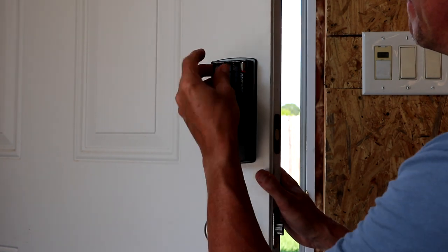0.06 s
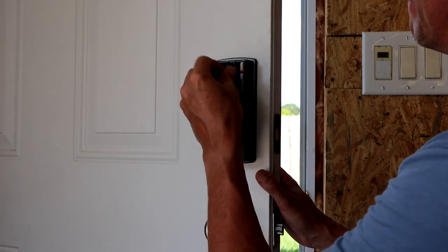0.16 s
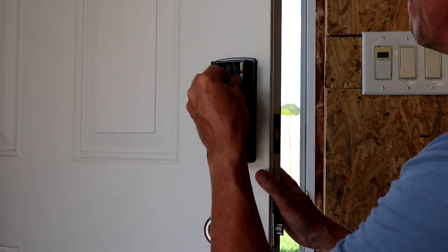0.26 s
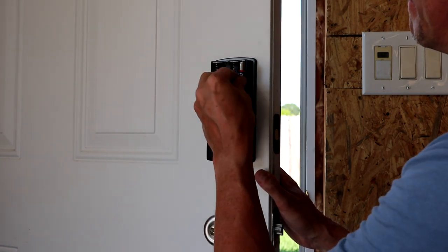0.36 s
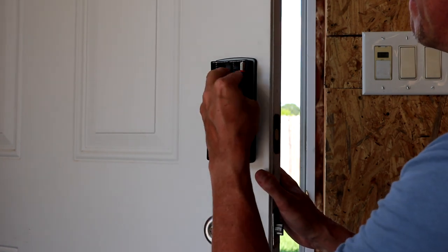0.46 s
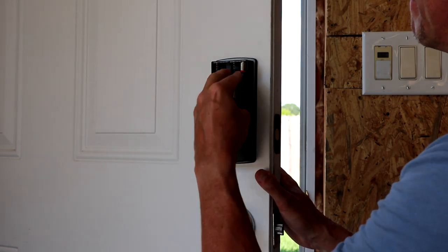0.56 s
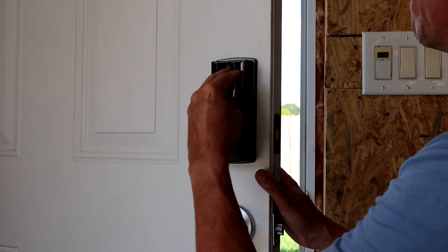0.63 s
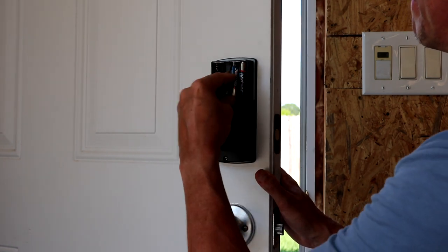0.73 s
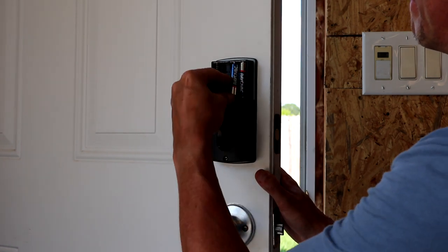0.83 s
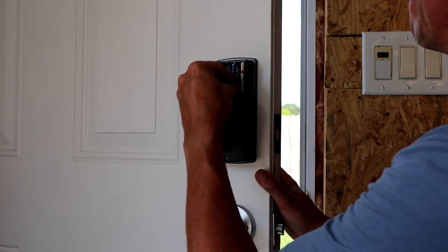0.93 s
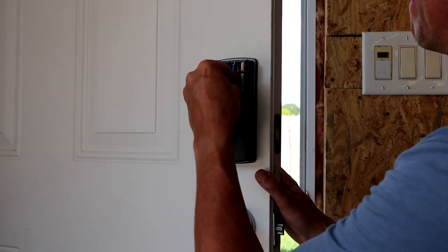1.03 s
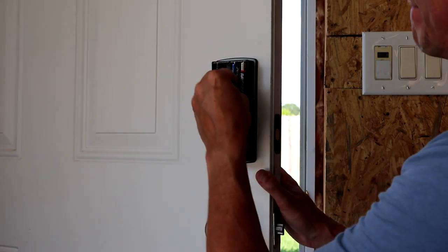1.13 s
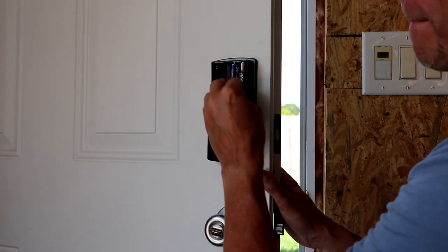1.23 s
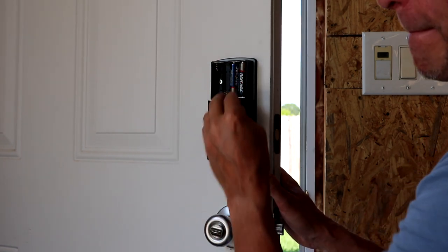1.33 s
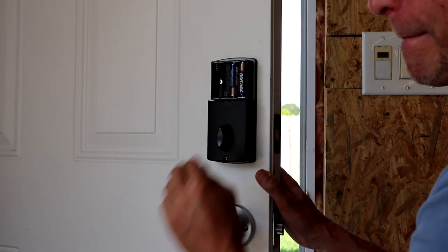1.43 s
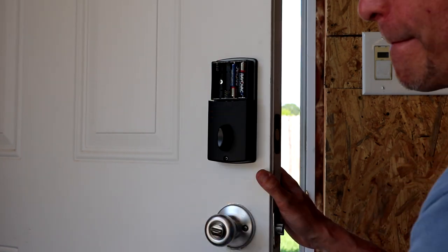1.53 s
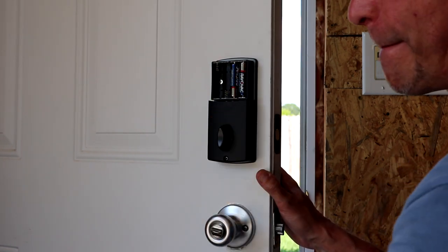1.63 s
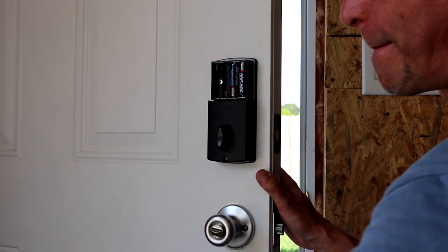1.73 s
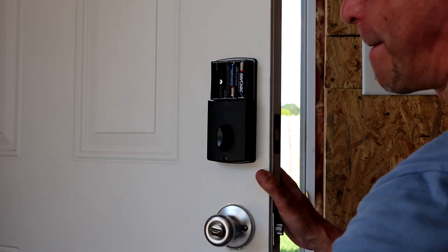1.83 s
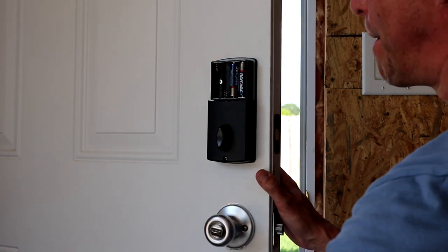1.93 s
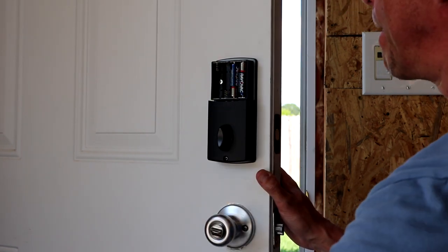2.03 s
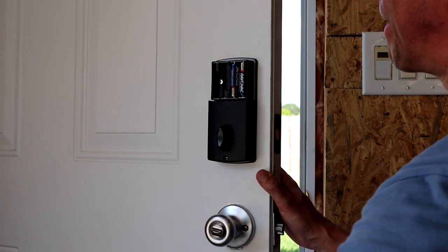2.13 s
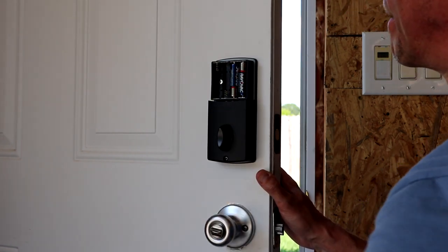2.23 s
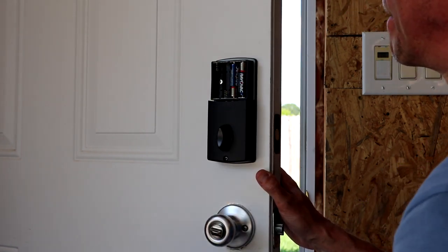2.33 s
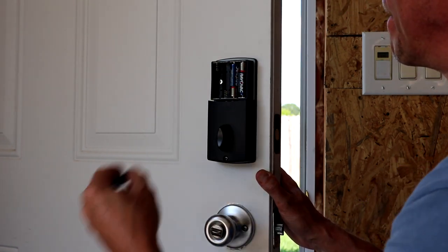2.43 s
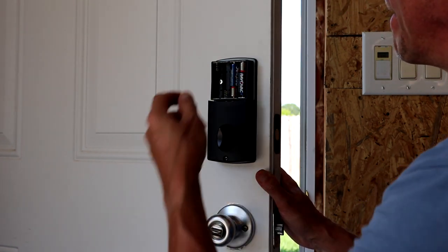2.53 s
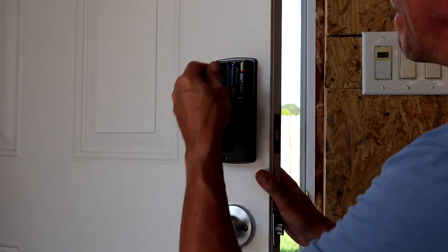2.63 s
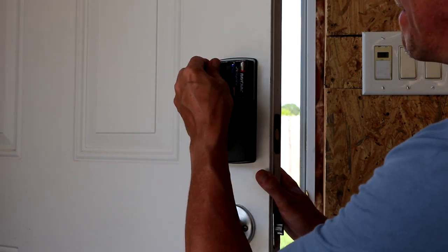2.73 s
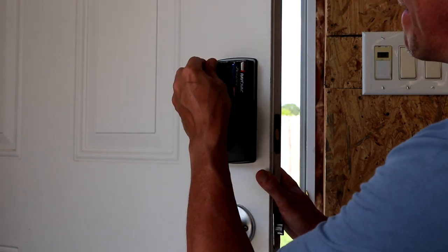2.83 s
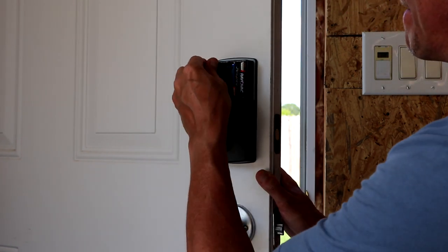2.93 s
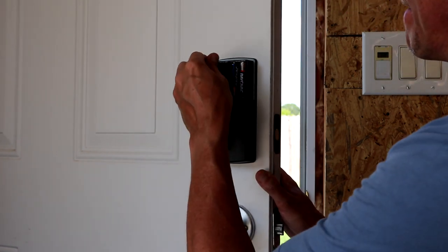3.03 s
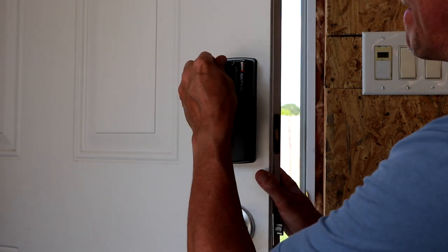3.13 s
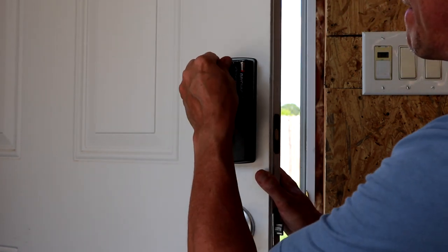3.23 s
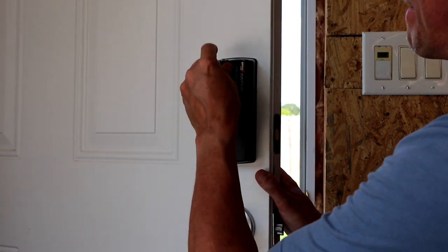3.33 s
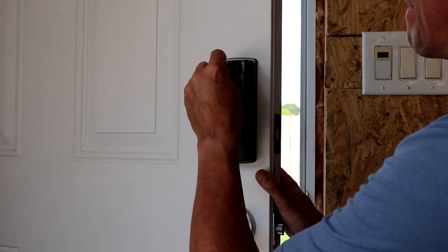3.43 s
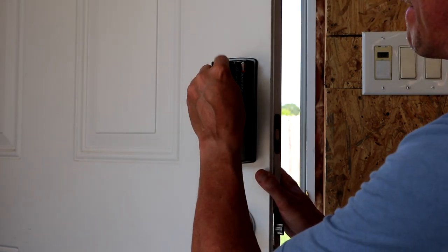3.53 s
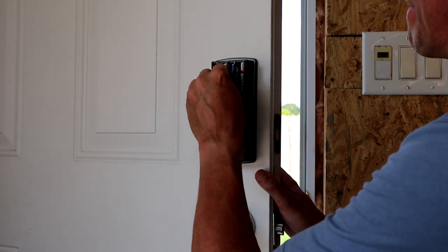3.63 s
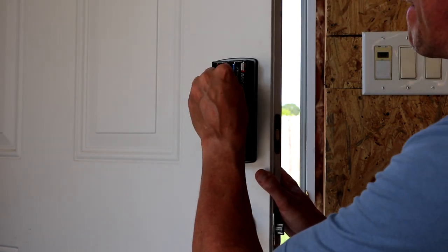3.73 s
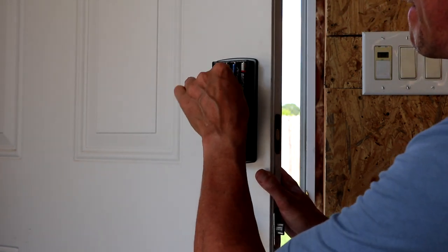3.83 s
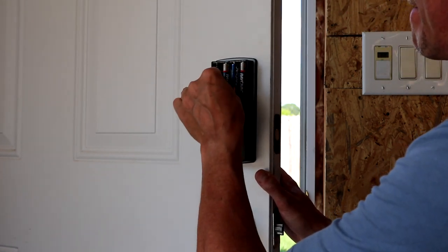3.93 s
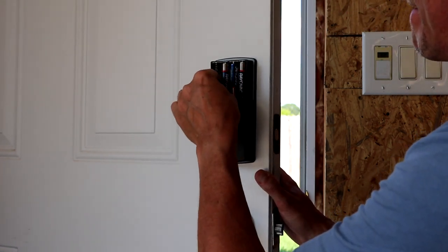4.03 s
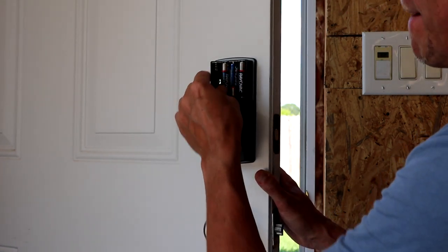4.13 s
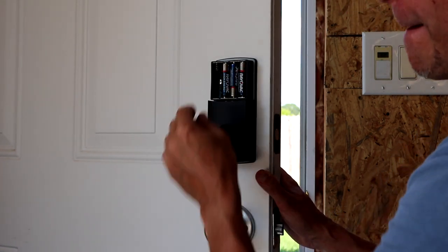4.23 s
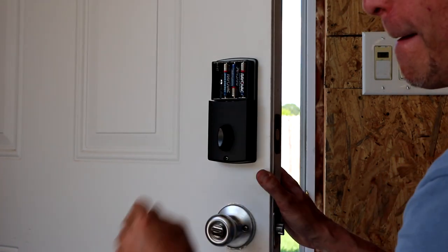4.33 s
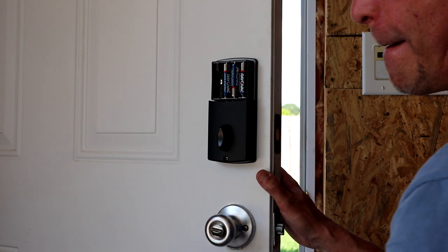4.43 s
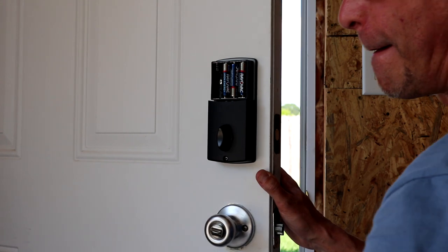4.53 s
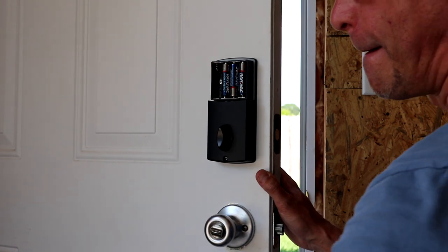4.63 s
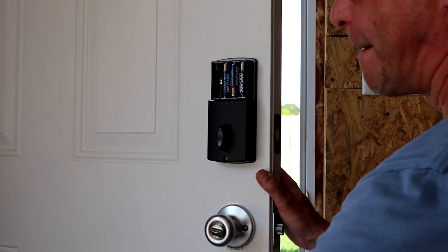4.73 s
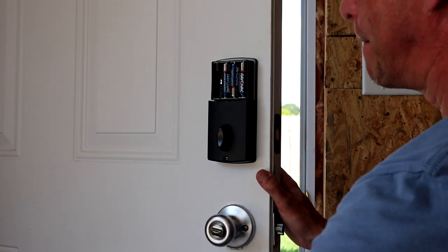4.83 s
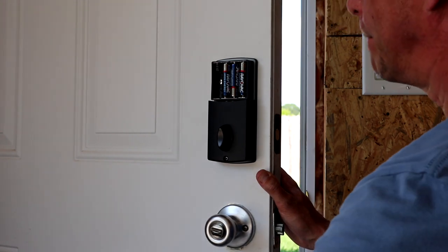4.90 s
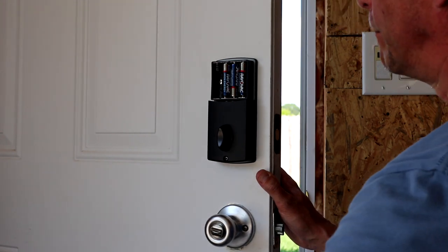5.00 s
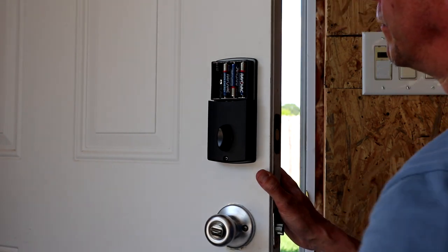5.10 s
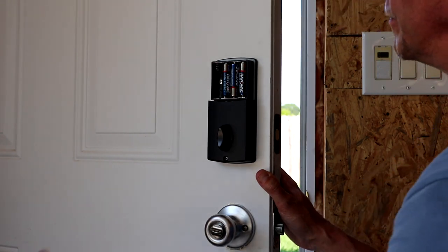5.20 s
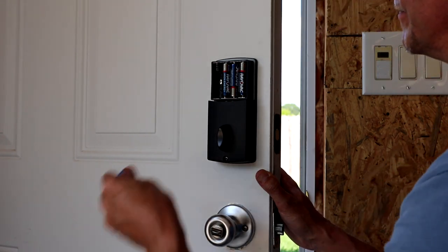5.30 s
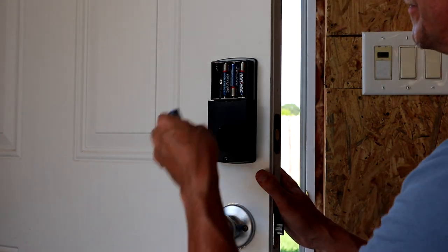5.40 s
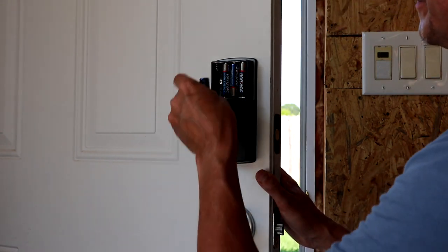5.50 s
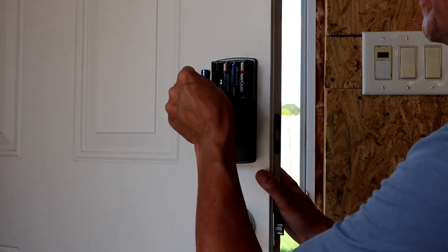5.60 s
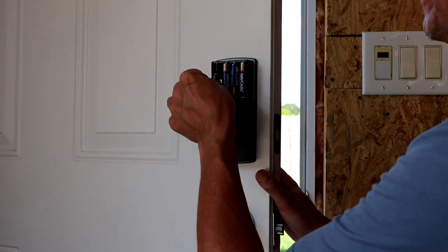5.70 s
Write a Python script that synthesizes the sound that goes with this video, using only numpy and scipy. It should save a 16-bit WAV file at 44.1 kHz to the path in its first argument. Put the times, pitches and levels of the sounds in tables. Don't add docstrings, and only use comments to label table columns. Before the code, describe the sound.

Batteries click and tap into a plastic lock compartment, a spring contact buzzing briefly, over low motor hum while birds sing outside.

```python
import sys
import numpy as np
from scipy import signal
from scipy.io import wavfile
from scipy.ndimage import uniform_filter1d

SR = 44100
rng = np.random.default_rng(int(sys.argv[2]) if len(sys.argv) > 2 else 0)


def output_pcm(signal):
    pcm = np.clip(np.atleast_2d(signal).T, -1, 1) * 32767
    wavfile.write(sys.argv[1], SR, np.round(pcm).astype(np.int16))


def linear_from_db(decibels):
    return 10 ** (np.asarray(decibels, float) / 20)


N = 254016

# start_s, peak_db, centre_hz, contact tick_db and door thump_db re the blow
TAPS = [(0.9245, -35, 1700, -24, -1), (0.423, -34, 1760, -25, -18), (0.483, -25, 1000, -38, -6),
        (.95, -12, 2040, -6.5, -8.5), (0.9834, -18, 1690, -7, -8.5), (.4545, -20, 2100, -19.5, -12),
        (1.969, -29.5, 1910, -40, -14), (2.749, -44, 1750, -46, -12.5), (2.814, -21.5, 1820, -20.5, -5),
        (3.199, -40, 786, -12, 9), (3.4125, -27, 2800, -34, -15), (3.589, -22, 1150, -27, -10)]
PRESSES = [(.668, -37, 3350, -40, -16), (.989, -25, 2100, -25, -7), (3.4738, -24, 1900, -19, -13),
           (3.615, -19, 2300, -13, -10), (3.6195, -23, 2000, -28, -14), (3.623, -24, 3300, -28, -20),
           (3.635, -32, 1030, -25, 2.5), (5.044, -37, 800, -47, 4)]
SLIDES = [(2.041, -28.5, 2000, -45, -2), (2.051, -32.5, 2510, -22, -9), (3.575, -27.5, 1737, -27, -21),
          (3.628, -27.5, 3900, -26, -21), (5.069, -29.5, 920, -43, -0.5)]
DRAGS = [(3.638, -37, 3700, -30, -25)]
TAP_S, PRESS_S, SLIDE_S, DRAG_S = 0.0045, 0.0072, 0.0089, 0.027

# pitch_hz, width_hz, level_db
CASE_MODES = [(1063, 120, 10.5), (1316, 290, 4.5), (1750, 650, 5.5), (2250, 303, 3), (2940, 330, 4),
              (3520, 310, -8), (4430, 740, -20), (2300, 3270, -4)]
# pitch_hz, width_hz, level_db
DOOR_MODES = [(145, 69, -5), (254, 71, -8.5), (343, 30, -1), (464, 39, -0.5), (554, 123, -2),
              (805, 240, -7.5)]
# start_s,
# peak_db, pitch_hz
PANEL_RINGS = [(.461, -30, 58.6), (.4553, -23, 1718), (.456, -26.5, 3150), (.455, -38, 970),
               (.926, -25, 1700), (.927, -38, 3150), (.951, -20, 1040), (.952, -25, 1520), (.955, -26, 760),
               (.963, -27.5, 494), (.984, -22.5, 1020), (.9841, -26, 500), (.9842, -29, 2850),
               (.993, -27, 3000), (.995, -28, 482), (1.031, -33, 1770), (1.969, -25.5, 255),
               (2.055, -26.5, 2360), (2.815, -46, 152), (3.203, -30.5, 806), (3.414, -31, 1670),
               (3.415, -33, 2920), (3.476, -30, 3090), (3.475, -27, 1430), (3.4751, -36, 1036),
               (3.585, -28, 990), (3.6, -31, 145), (3.616, -21.5, 1006), (3.617, -32, 498),
               (3.621, -31, 64.7), (5.044, -26, 231), (5.0455, -26, 370), (5.048, -33, 1080),
               (5.07, -30, 312)]
# pitch_hz, t60_s
PANEL_DECAY = [(60, 0.18), (150, 0.27), (235, 0.057), (372, 0.041), (485, 0.14), (800, 0.062),
               (1750, 0.047), (3000, 0.028)]
# pitch_hz, width_hz, level_db
CONTACT_MODES = [(6500, 1000, 4), (8500, 1400, -5), (10200, 1100, -11), (12800, 1500, -15),
                 (15200, 900, -14)]
# start_s, peak_db, pitch_hz, side_share (off-centre)
TICKS = [
    (.873, -42.5, 9700, 0.72),
    (.973, -42, 8500, 0.34),
    (3.558, -41.5, 6820, 0.32),
    (3.6052, -39, 8840, .3),
    (3.895, -41.5, 6100, 0.4),
    (4.285, -45, 11000, 2.2),
    (5.3098, -56, 13450, 4),
    (3.203, -54, 8500, .5),
]

BUZZ_HZ = 200.6
BUZZ_S, BUZZ_RISE_S, BUZZ_HOLD_S, BUZZ_DROP_S, BUZZ_FADE_S = 1.0295, .0022, .031, .007, .035
BUZZ_DB, BUZZ_DROP_DB, BUZZ_FADE_DB, BUZZ_REST_DB = -28, -14, -22, -32
# pitch_hz, width_hz, level_db
BUZZ_MODES = [(1775, 200, -1), (3005, 110, 6), (3210, 110, 0), (3405, 130, 1), (3812, 120, 5),
              (2900, 1600, -12), (6430, 880, -12), (8050, 1200, -16), (9000, 1300, -20), (11000, 1300, -26),
              (13200, 660, -28), (15200, 700, -29)]
# pitch_hz, width_hz, level_db, t60_s
COIL_MODES = [(2900, 90, -48, 0.64), (3680, 44, -58, 2.6), (3834, 65, -56, 0.31), (5480, 110, -65, 0.22),
              (6370, 29, -66, 2), (6710, 480, -63.5, 3.2), (7650, 180, -65, 0.6), (8500, 560, -62.5, 1.8),
              (11400, 900, -63, 0.35)]

# start_s, swell_s, pitch_hz, peak_db
LOW_NOTES = [
    (4.245, 0.086, 2704, -51.5),
    (4.53, 0.075, 2644, -47.5),
    (4.82, 0.082, 2630, -46),
]
# start_s, swell_s, pitch_hz, peak_db
HIGH_NOTES = [
    (3.05, 0.024, 5530, -70),
    (3.345, 0.037, 5480, -62.5),
    (3.575, 0.042, 5590, -57),
    (3.805, .035, 5480, -60),
    (5.7, 0.048, 6340, -62),
]
# start_s, swell_s, pitch_hz, peak_db
STRANDS = [
    (3.96, 0.088, 3120, -53.5),
    (3.975, 0.045, 3310, -55),
    (4.28, 0.16, 3160, -52.5),
    (4.42, 0.2, 3345, -55.5),
]
# time_s, pitch_hz, level_db
HELD_NOTE = [
    (-.02, 2570, -47.5),
    (.064, 2644, -49.5),
    (.076, 2660, -72),
]
# middle_s, pitch_hz, peak_db
TRILL = [(4.82, 3870, -53), (4.868, 3830, -49), (4.92, 3812, -49), (4.972, 3815, -54), (5.02, 3800, -57),
         (5.078, 3815, -53), (5.128, 3812, -45), (5.172, 3792, -49), (5.226, 3792, -51), (5.28, 3800, -54),
         (5.315, 3875, -55), (5.352, 3822, -46), (5.4, 3830, -50), (5.46, 3830, -56), (5.495, 3810, -57),
         (5.548, 3855, -56), (5.582, 3845, -52), (5.616, 3837, -48), (5.658, 3830, -49), (5.71, 3820, -57),
         (5.745, 3850, -59)]
# start_s, level_db, start_hz, end_hz
CHIPS = [
    (4.723, -66.5, 6870, 5760),
    (4.955, -60.5, 7100, 5540),
    (5.199, -61, 7300, 5530),
    (5.452, -63.5, 7100, 5800),
]
# start_s, level_db, start_hz, end_hz
SIDE_CHIPS = [
    (.055, -69, 7000, 5000),
    (.09, -70, 5050, 5200),
    (.225, -66, 4400, 3600),
    (.36, -69, 7000, 5000),
    (.395, -72, 5050, 5200),
]
# entry_db, release_s, echo_db, echo_s
LOW_ENVELOPE, HIGH_ENVELOPE, STRAND_ENVELOPE = (-4, .03, -13, .14), (-16, .03, -24, .008), (-8, .025, -13, .02)
# entry_hz off pitch, glide_share of the swell, sag_hz at release
LOW_BEND, HIGH_BEND, STRAND_BEND = (-90, .55, -50), (80, .5, 30), (-60, .5, -40)
# time_s, level_db
CHORUS = [
    (4.5, -95.5),
    (4.72, -74),
    (5.76, -73.5),
]

SHAFT_HZ = 51.65
# pitch_hz, width_hz, level_db
HUM = [(53.9, 12, -50), (157, 17, -54.5), (313, 10, -61), (479, 4.6, -70), (512.4, 12, -63),
       (990, 4.1, -83)]
# time_s, level_db
LOAD = [
    (0.0, -63),
    (1.11, -58),
    (1.6, -52),
    (2.5, -54),
    (2.98, -65.5),
    (3.11, -53.5),
    (4.2, -49.5),
    (5.0, -45.5),
    (5.26, -41.5),
    (5.76, -47),
]
# middle_s, length_s, lift_db
SURGES = [
    (1.11, 0.16, 12.6),
    (2.0, .3, 6.3),
    (2.75, 0.22, 5.5),
    (3.7, 1.35, 9.9),
    (5.4, 1.1, 6.3),
]
WHINE_HZ = [1722, 1747, 1771, 1915, 1942, 2010, 2055, 2097, 2316]
# width_hz, level_db
WHINE_LINES = [(4, -56), (5, -55), (3.2, -59.5), (15, -59), (5.9, -60.5), (41, -57), (4, -57), (10, -62.5),
               (7.1, -64.5)]

# pitch_hz, density_db per Hz
AIR_SUM = [(22, -6), (38, -13), (55, 3.5), (107, -7.5), (226, -11), (523, -11.5), (1000, -12.5),
           (1390, -18), (1850, -14), (2490, -21), (4000, -35.5), (6260, -41.5), (8050, -47.5), (9780, -44),
           (11500, -53), (15700, -67)]
# pitch_hz, density_db per Hz
AIR_DIFFERENCE = [(20, -74), (59, -32), (93, -31.5), (162, -21), (396, -23), (817, -19), (1310, -19.5),
                  (1850, -24.5), (2430, -24.5), (4000, -26.5), (6260, -38.5), (8300, -45.5), (10000, -38),
                  (12500, -54), (15700, -63.5)]
# pitch_hz, share of the difference tied to the sum
AIR_COHERENCE = [(200, 0.02), (700, 0.73), (1300, 0.43), (2400, 0.42), (4400, .1), (9000, 0.016)]
# pitch_hz, t60_s
ROOM_DECAY = [(150, 0.98), (1000, 0.15), (4000, 0.61), (12000, 0.16)]
# pitch_hz, need_db over the usual difference level
SUM_GATE = [(3000, -25), (4400, -13), (5600, -3), (6900, 2), (8300, 3.5), (9100, -1), (9800, -21.5),
            (10500, -2.5), (12000, -2.5), (15000, 3.5)]
# pitch_hz, need_db
DIFFERENCE_GATE = [(9000, -30), (10300, -13), (10900, 2), (12500, 1), (13500, 4), (15000, 22)]


def evened(x):
    return x / np.sqrt(np.mean(x ** 2) + 1e-20)


def read(points, hz):
    f, value = np.transpose(points)
    return np.interp(np.log(hz + 1), np.log(f + 1), value)


def add(mix, s, sound):
    at = round(s * SR)
    part = mix[max(at, 0):][:len(sound) + min(at, 0)]
    part += sound[max(-at, 0):][:len(part)]


def resonate(x, hz, width):
    turn = np.exp(2j * np.pi * np.cumsum(hz * np.ones(len(x))) / SR)
    r = np.exp(-np.pi * width / SR)
    return 2 * (turn * signal.lfilter([1 - r], [1, -r], x / turn)).real


def resonate_twice(x, hz, width):
    return resonate(resonate(x, hz, width), hz, width)


def ring(x, modes):
    y = sum((-1) ** k * linear_from_db(db) * resonate(x, hz, width) for k, (hz, width, db) in enumerate(modes))
    return y / abs(y).max()


def ports(mid, side):
    return np.array([mid + side, mid - side])


def tick(noise, modes):
    t = np.arange(len(noise)) / SR
    crack = noise * (np.exp(-t / 0.00034) + 0.08 * np.exp(-t / 0.0075))
    return ring(resonate_twice(crack, 7500, 4500), modes)


def blows():
    kinds = [(TAPS, TAP_S), (PRESSES, PRESS_S), (SLIDES, SLIDE_S), (DRAGS, DRAG_S)]
    return sorted((*row, length) for rows, length in kinds for row in rows)


def knocks():
    out, t = np.zeros(N), np.arange(5000) / SR
    dull = signal.butter(4, 4300 / (SR / 2))
    rows = blows()
    for (s, db, hz, tick_db, thump_db, length), noise in zip(rows, rng.standard_normal((len(rows), 3, 5000))):
        snap = -4.5 * (0.0036 / length) ** 2 * np.exp(-((t - .0008) / .00007) ** 2)
        decay = np.exp(-t / length) + 0.38 * np.exp(-t / 0.02)
        scrape = decay * np.clip((t - .0007) / (0.27 * length), 0, 1)
        grains = noise[0] * uniform_filter1d(noise[2], size=30) * 4.7 * scrape
        near = [(f, width, g - 4.6 * abs(np.log2(f / hz))) for f, width, g in CASE_MODES]
        body = ring(signal.lfilter(*dull, snap + grains), near + [(hz, 300, -4.0)])
        thump = linear_from_db(thump_db) * ring(signal.lfilter(*dull, snap + noise[1] * scrape), DOOR_MODES)
        add(out, s, linear_from_db(db) * (body + thump))
        add(out, s + 0.0007, linear_from_db(db + tick_db) * tick(noise[2], CONTACT_MODES))
    return out


def panel_rings():
    out, t = np.zeros(N), np.arange(12000) / SR
    for s, db, hz in PANEL_RINGS:
        envelope = linear_from_db(db - 60 * t / read(PANEL_DECAY, hz)) * (1 - np.exp(-t * hz * 2.5))
        add(out, s, -envelope * np.sin(2 * np.pi * hz * t))
    return out


def contacts():
    mid, side = np.zeros((2, N))
    for (s, db, hz, share), noise in zip(TICKS, rng.standard_normal((len(TICKS), 2, 2000))):
        add(mid, s + 0.00058, linear_from_db(db) * tick(noise[0], CONTACT_MODES + [(hz, 1500, 1.5)]))
        add(side, s + 0.0017, share * linear_from_db(db) * tick(noise[1], CONTACT_MODES + [(hz, 3000, 6.0)]))
    return ports(mid, side)


def spring():
    s = BUZZ_S + np.cumsum([0, BUZZ_RISE_S, BUZZ_HOLD_S, BUZZ_DROP_S, BUZZ_FADE_S, .1])
    level_db = BUZZ_DB + np.array([-30, -1.5, 0, BUZZ_DROP_DB, BUZZ_FADE_DB, BUZZ_REST_DB])
    t = np.arange(s[0], s[0] + 1, 1 / SR)
    since = t - s[0]
    impacts = np.diff(np.floor(BUZZ_HZ * since), prepend=0)
    impacts = evened(impacts - impacts.mean())
    grit = rng.standard_normal(len(t))
    rattle = sum((-1) ** k * linear_from_db(db) * resonate_twice(impacts + width / 550 * grit, hz, width)
                 for k, (hz, width, db) in enumerate(BUZZ_MODES))
    out = np.zeros(N)
    add(out, s[0], evened(rattle) * linear_from_db(np.interp(t, s, level_db, right=-120)))
    for hz, width, db, t60 in COIL_MODES:
        fuzz = evened(resonate_twice(rng.standard_normal(len(t)), hz, width))
        add(out, s[1], linear_from_db(db - 60 * since / t60) * fuzz * (1 - np.exp(-since / 0.021)))
    return out


def whistle(rows, throb=0., pulse=0.):
    s, hz, db = np.transpose(rows)
    t = np.arange(s[0], s[-1], 1 / SR)
    flutter = 1 + throb * np.sin(2 * np.pi * 47.8 * t)
    flutter = flutter * (1 + pulse * np.cos(2 * np.pi * 21.56 * (t - s[len(s) // 2])))
    waver = 22.1 * np.sin(2 * np.pi * 13 * t) * np.sin(2 * np.pi * 0.37 * 13 * t)
    pitch = np.interp(t, s, hz) + waver
    tone = np.sqrt(2) * np.sin(2 * np.pi * np.cumsum(pitch) / SR)
    edges = np.clip(np.minimum(t - s[0], s[-1] - t) / 0.0041, 0, 1)
    return s[0], linear_from_db(np.interp(t, s, db)) * flutter * tone * edges


def sing(note, envelope, bend):
    start, swell, hz, db = note
    entry_db, release, echo_db, echo = envelope
    entry_hz, glide, sag_hz = bend
    s = np.cumsum([0, glide * swell, (1 - glide) * swell, release, echo])
    pitch = hz + np.array([entry_hz, 0, 0, sag_hz, 0])
    level_db = db + np.array([entry_db, (1 - glide) * entry_db, 0, echo_db, echo_db - 3])
    return np.transpose([start + s, pitch, level_db])


def trill():
    s, hz, db = np.transpose(TRILL)
    t = np.arange(s[0] - .05, N / SR, 1 / SR)
    pitch = np.interp(t, s, hz)
    beads = sum(linear_from_db(g - 3.0) * np.exp(-((t - at) / .0155) ** 2 / 2) for at, g in zip(s, db))
    tone = beads * np.sqrt(2) * np.sin(2 * np.pi * np.cumsum(pitch) / SR)
    twin = evened(resonate_twice(rng.standard_normal(len(t)), pitch + 58, 60))
    return t[0], tone + linear_from_db(-10) * twin * uniform_filter1d(abs(beads), size=2000)


def buzzy_song():
    start, end = 3.93, 4.76
    t = np.arange(start, end, 1 / SR)
    done = (t - start) / (end - start)
    pitch = 3195 + 180 * done
    rasp = evened(resonate_twice(rng.standard_normal(len(t)), pitch, 250))
    level_db = -53 - 6 * done - 6.5 * np.cos(np.pi * 2.73 * done + .4 * np.pi) ** 2
    return start, linear_from_db(level_db) * rasp * signal.windows.tukey(len(t), .1)


def birds():
    mid, side = np.zeros((2, N))
    for notes, envelope, bend, pulse in [(LOW_NOTES, LOW_ENVELOPE, LOW_BEND, .2),
                                         (STRANDS, STRAND_ENVELOPE, STRAND_BEND, .25),
                                         (HIGH_NOTES, HIGH_ENVELOPE, HIGH_BEND, .05)]:
        for note in notes:
            add(mid, *whistle(sing(note, envelope, bend), throb=0.24, pulse=pulse))
    add(mid, *whistle(HELD_NOTE))
    add(mid, *trill())
    add(mid, *buzzy_song())
    side += 0.82 * np.roll(mid, 3)
    for chips, share in [(CHIPS, 0.23), (SIDE_CHIPS, 2.3)]:
        for s, db, start_hz, end_hz in chips:
            chip = whistle([(s, start_hz, db), (s + 0.023, end_hz, db - 5)])[1]
            add(mid, s, chip)
            add(side, s, share * chip)
    return ports(mid, side)


def wavering(hz, width, steady=0.91):
    t = np.arange(N) / SR
    smooth = np.exp(-np.pi * width / 200)
    drift = signal.lfilter([1], [1, -smooth], rng.standard_normal((2, 1200)))
    a, b = (np.interp(t * 200, np.arange(1200), evened(row)) for row in drift)
    turn = 2 * np.pi * hz * t
    return evened((a + steady) * np.cos(turn) + b * np.sin(turn))


def motor():
    t = np.arange(N) / SR
    second_db = np.interp(t, *np.transpose(LOAD))
    fourth_db = -62 + sum(db * np.exp(-(2 * (t - s) / length) ** 2) for s, length, db in SURGES)
    hum = sum(linear_from_db(db) * wavering(hz, width) for hz, width, db in HUM)
    hum = hum + linear_from_db(second_db) * wavering(2 * SHAFT_HZ, 2.8, steady=4.9)
    hum = hum + linear_from_db(fourth_db) * wavering(4 * SHAFT_HZ, 1.15, steady=2.5)
    whine = sum(linear_from_db(db) * wavering(hz, width, steady=0.8) for hz, (width, db) in zip(WHINE_HZ, WHINE_LINES))
    late = np.roll(whine, 6)
    return hum + np.array([linear_from_db(6.0) * whine, linear_from_db(-0.5) * late])


def chorus():
    s, db = np.transpose(CHORUS)
    t = np.arange(s[0], s[-1], 1 / SR)
    out = np.zeros((2, N))
    for port in out:
        blur = resonate_twice(rng.standard_normal(len(t)), 6300, 900)
        add(port, s[0], linear_from_db(np.interp(t, s, db)) * evened(blur))
    return out


def air():
    frames, hz = N // 256 + 5, np.fft.rfftfreq(1024, 1 / SR)
    a, b, c, d, patches = rng.standard_normal((frames, 513, 5)).T
    patches = evened(uniform_filter1d(uniform_filter1d(patches, 10, 0), 12, 1))
    coherent = np.clip(read(AIR_COHERENCE, hz), 0, .99)[:, None]
    mid = a + 1j * b
    side = coherent * np.exp(0.88j) * mid + np.sqrt(1 - coherent ** 2) * (c + 1j * d)
    mid_part = mid * linear_from_db(read(AIR_SUM, hz))[:, None]
    side_part = side * linear_from_db(read(AIR_DIFFERENCE, hz))[:, None]
    z = np.array([mid_part, side_part]) * linear_from_db(1.05 * patches)
    mid, side = signal.istft(z, nperseg=1024, noverlap=768)[1][:, :N]
    return linear_from_db(-43.5) * ports(mid, side) / np.std(mid)


def room(x):
    taps = np.zeros((2, SR // 2))
    at = np.arange(100, SR // 2 - 20, 20) + rng.integers(0, 20, (2, (SR // 2 - 101) // 20))
    np.put_along_axis(taps, at, rng.choice([-1., 1.], at.shape), 1)
    hz, t, z = signal.stft(taps, SR, nperseg=256)
    z = z * linear_from_db(-60 * t / np.maximum(read(ROOM_DECAY, hz), .03)[:, None])
    alike = np.exp(-hz / 1700.0)[:, None]
    z[1] = alike * z[0] + np.sqrt(1 - alike ** 2) * z[1]
    tail = signal.istft(z, SR, nperseg=256)[1]
    return signal.fftconvolve(x, tail / np.linalg.norm(tail[0]), axes=1)[:, :N]


def scene():
    lock, near, song = knocks() + panel_rings() + spring(), contacts(), birds()
    direct = np.array([linear_from_db(-2.5) * lock, linear_from_db(-3.0) * np.roll(lock, 1)]) + near
    reverberant = linear_from_db(-10.0) * room(lock + near) + linear_from_db(-7.5) * room(song)
    return direct + song + reverberant + chorus() + air() + motor()


def roll_off(x):
    return signal.sosfilt(signal.butter(12, 15870, fs=SR, output="sos"), x)


def record(dry):
    hz, _, z = signal.stft(ports(*dry) / 2, SR, "cosine", nperseg=2048, noverlap=1024)
    bands = (abs(z[:, :1024]) ** 2).reshape(2, 64, 16, -1).mean(2) + 1e-20
    over_db = 10 * np.log10(bands / np.median(bands[1], 1, keepdims=True))
    doubt_db = 3.0 * evened(uniform_filter1d(rng.standard_normal(over_db.shape), size=3, axis=2))
    need_db = np.array([read(gate, hz[8:1024:16]) for gate in (SUM_GATE, DIFFERENCE_GATE)])
    z[:, :1024] *= np.repeat(over_db + doubt_db > need_db[..., None], 16, axis=1)
    mid, side = signal.istft(z, SR, "cosine", nperseg=2048, noverlap=1024)[1][:, :N]
    finished = ports(mid, side)
    return roll_off(finished)


dry = scene()
out = record(dry)
output_pcm(out)
```